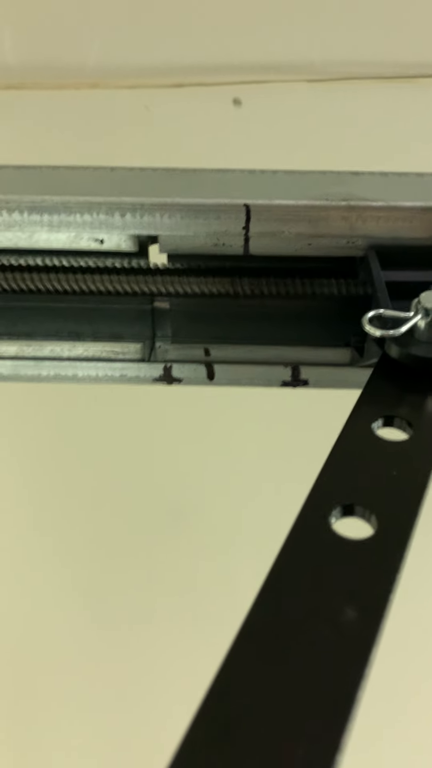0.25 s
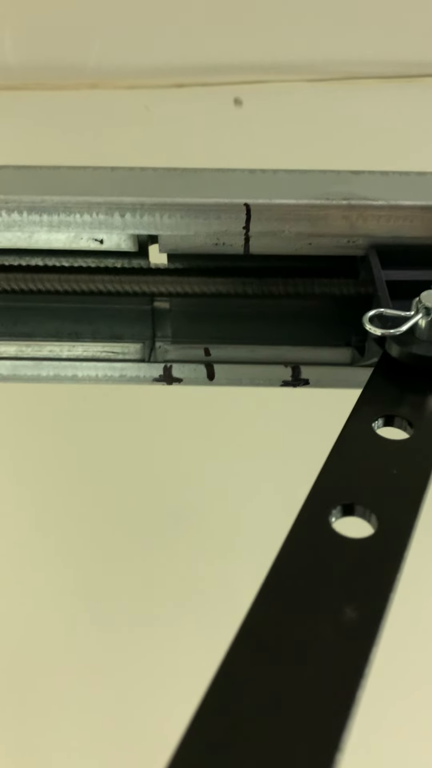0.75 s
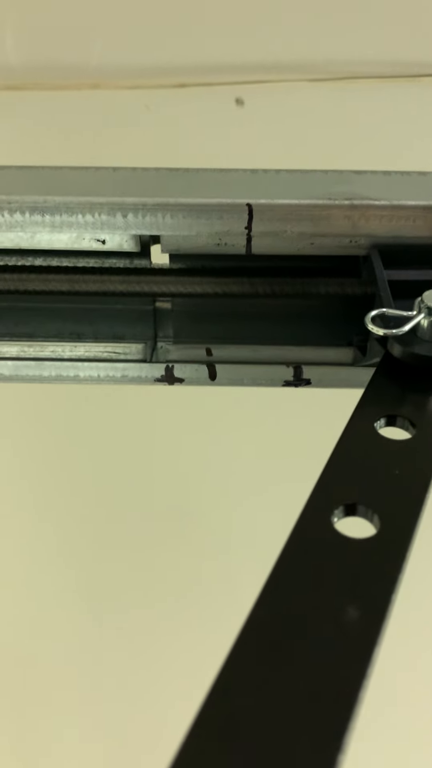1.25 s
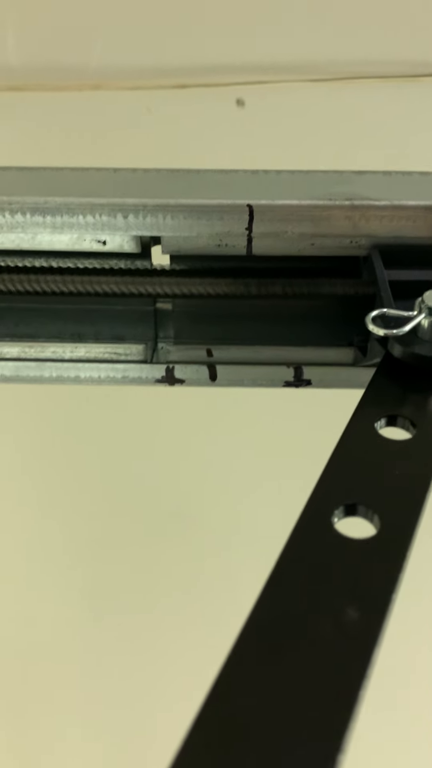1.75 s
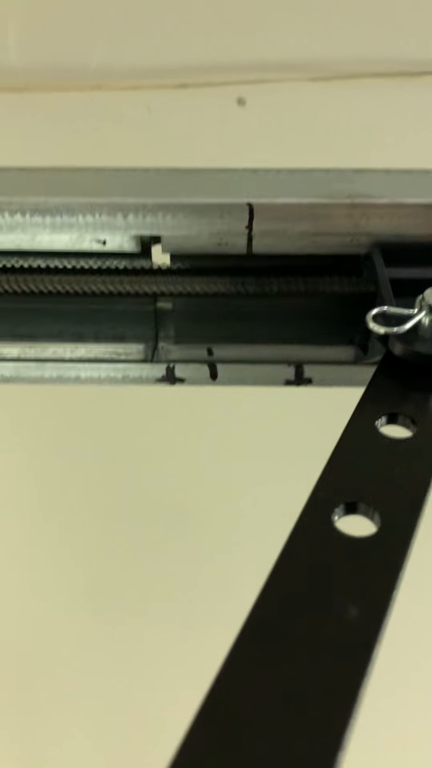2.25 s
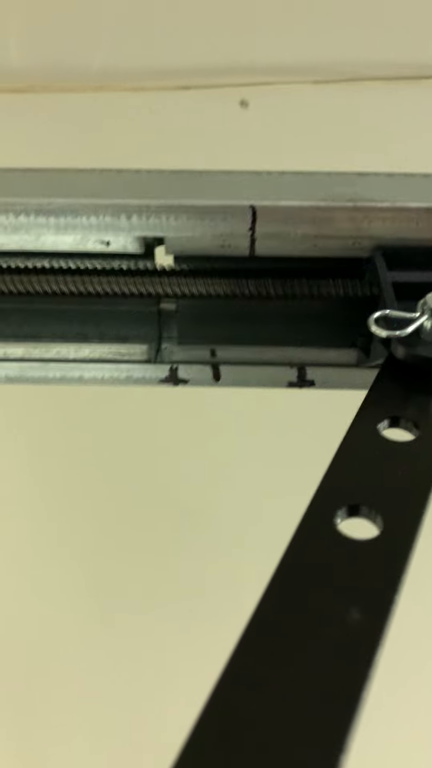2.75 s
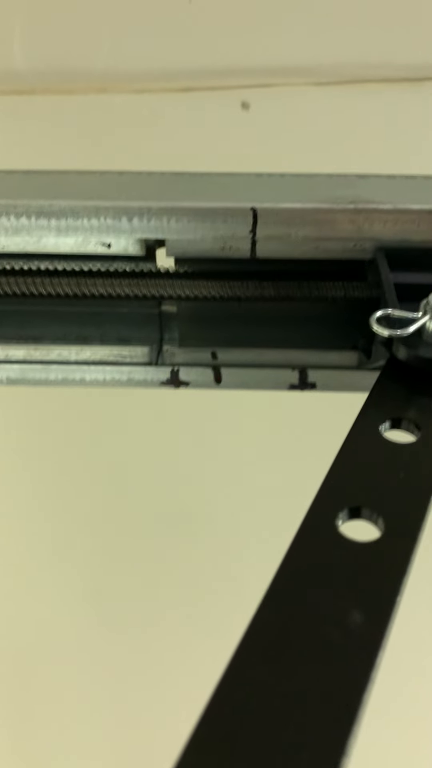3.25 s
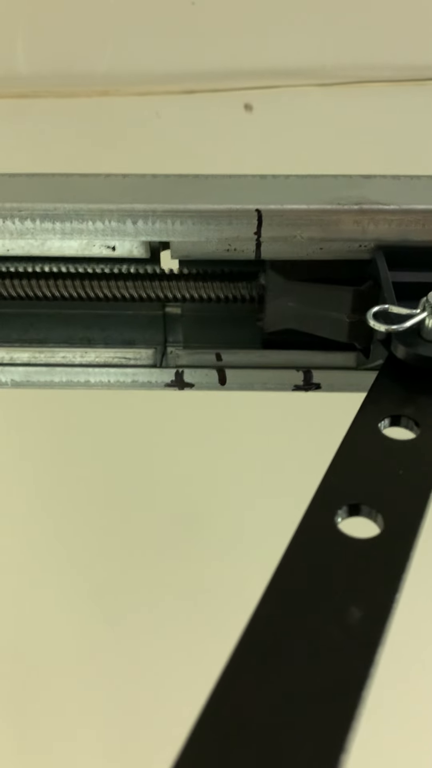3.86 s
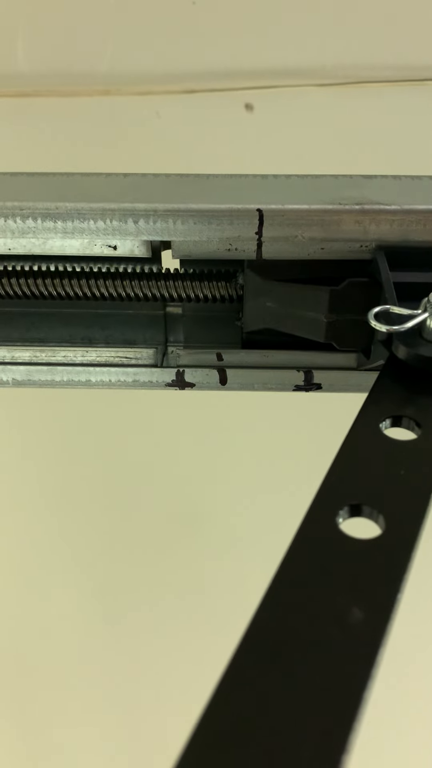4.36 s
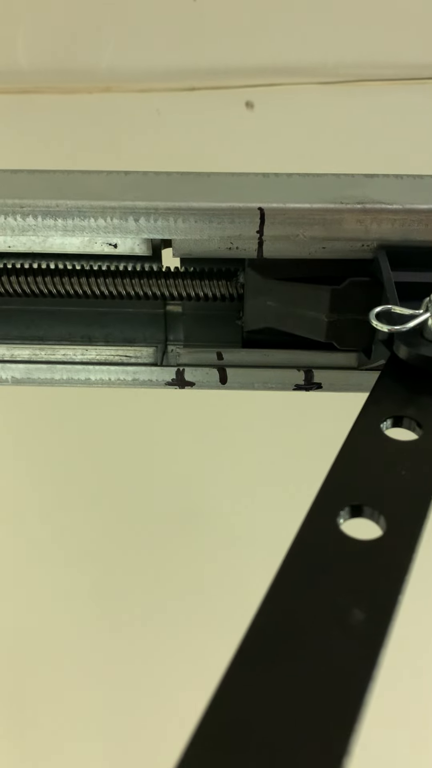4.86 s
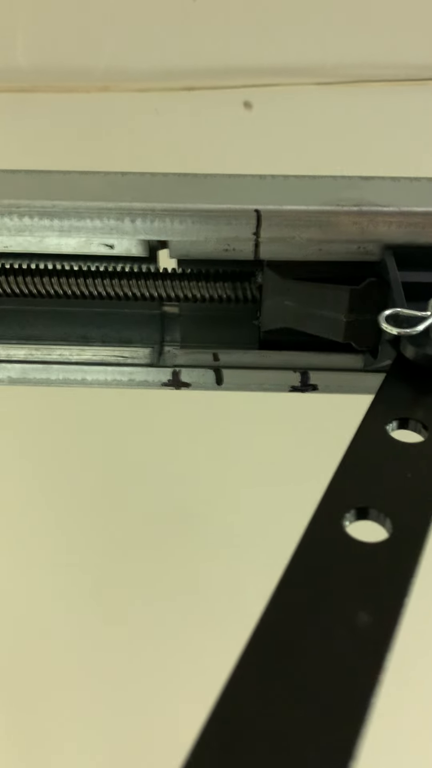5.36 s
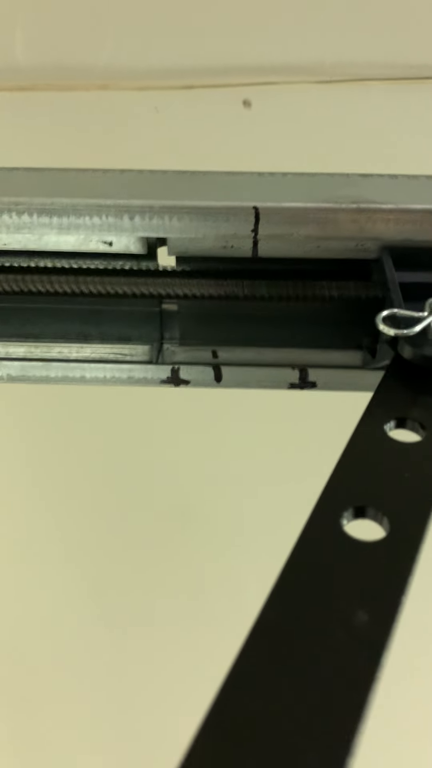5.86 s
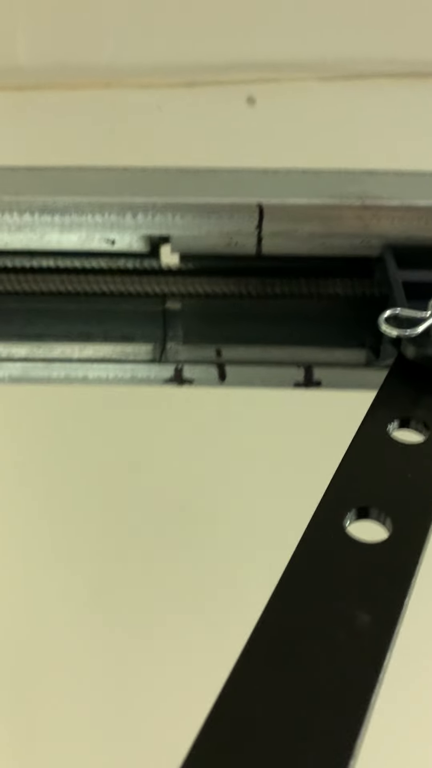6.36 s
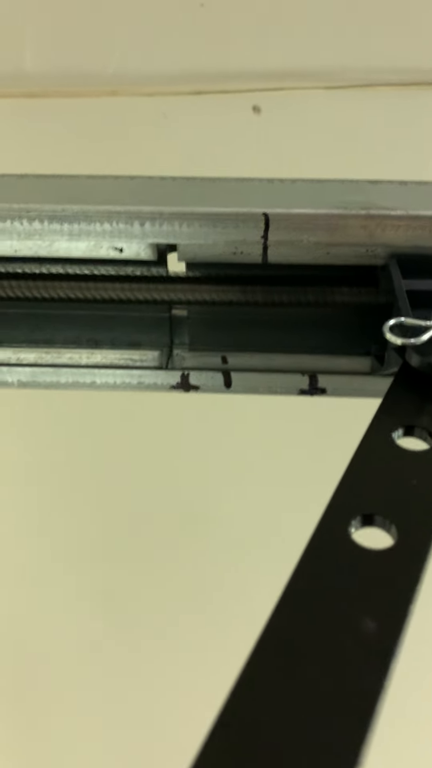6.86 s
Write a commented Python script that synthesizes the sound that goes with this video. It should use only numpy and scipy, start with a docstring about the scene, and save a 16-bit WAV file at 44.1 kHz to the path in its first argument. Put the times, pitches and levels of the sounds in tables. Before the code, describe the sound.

From the start, a threaded steel rod spins in its rail close overhead: a low hum around 50-120 Hz, a rapid rattle about 23 times a second, rough hiss and a thin, steady 10 kHz whine. Bright ticks repeat about every 0.04 s through the first second, with raspy chirps strongest near 1 s and a hard bump at 1.12 s. The run continues more evenly until 2.9 s, then groans briefly, loosens and drops in pitch. At about 4 s it fades quickly with a soft thud, clack and short scrape. Near quiet follows, with faint room noise and a tiny knock. At 5.1 s metal snaps and scrapes; clacks at 5.3 s lead into the restart. The rattle and hum climb rapidly, with low shudders near 6 s and a short groan at 6.16 s, then hold faster and higher until 7 s. The bare garage adds a short echo.

```python
"""A hum, a rattle that repeats each turn and a thin whine slow down and stop; after about a second of near quiet,
scrapes and clacks lead into a faster second run. This is a screw-drive garage door opener, heard from just under its rail.
The threaded rod strikes and rubs its rail and carriage, and shakes the ceiling at multiples of its speed.
The motor's switching supply makes the whine, steel parts snap and scrape, and the bare garage answers with an echo."""
import sys
import numpy as np
from scipy import signal
from scipy.fft import rfft, irfft, next_fast_len
from scipy.io import wavfile
from scipy.ndimage import uniform_filter1d, map_coordinates

SR = 44100
rng = np.random.default_rng(int(sys.argv[2]) if len(sys.argv) > 2 else 0)


def to_wav(sig):
    """Store sig (one row per channel, or 1-D mono) as 16-bit WAV at the path in sys.argv[1].

    Samples outside -1..1 are clipped; the rate is SR.
    """
    pcm = np.clip(np.atleast_2d(sig), -1, 1) * 32767
    pcm = np.round(pcm).astype(np.int16)
    wavfile.write(sys.argv[1], SR, pcm.T)  # frames by channels


N = 313102
T = np.arange(N) / SR  # time of each sample, s

COAST_S, START_S = 4.01, 5.33  # the drive begins to fade; the second run is at full strength
CRUISE_TURNS_PER_S = 23.4

# In noise colours only the shape counts, because the noise is brought to rms 1.
# colour of the shaken mounts: (frequency [Hz], level [dB])
MOUNT_COLOUR = [(20, -29), (40, -9), (65, 4.5), (95, -2), (150, -4), (220, -13), (800, -51.5)]
# colour of a sharp crack of steel: (frequency [Hz], level [dB])
CRACK_COLOUR = [(1500, -17.5), (4000, -3.5), (6800, 5), (10500, -1), (15000, 0)]
# strength of the room's sound against the direct sound: (frequency [Hz], level [dB])
ROOM_OVER_DIRECT = [(60, -6), (300, 0), (900, -6), (1400, -12), (2000, -1), (3000, -1), (5000, -10)]


def amp(db):
    """Turn decibels into a gain."""
    return 10 ** (np.asarray(db) / 20)


def unit(x):
    """Scale to rms 1."""
    return x / np.sqrt(np.mean(x ** 2) + 1e-20)


def along(points, hz):
    """Read (Hz, value) points along a logarithmic frequency axis."""
    f, v = np.transpose(points)
    return np.interp(np.log(hz + 1), np.log(f + 1), v)


def curves(rows):
    """Give one value per sample for each column after the time."""
    s, *cols = np.transpose(rows)
    return [np.interp(T, s, c) for c in cols]


def wobble(rate):
    """A smooth random curve with the given number of knots a second."""
    knots = rng.standard_normal(int(N * rate / SR) + 4)
    steps = np.arange(0, len(knots) - 1, 1 / 8)
    return np.interp(T * rate, steps, map_coordinates(knots, [steps]))


def filtered(x, response):
    """Multiply the spectrum of x by a response that may be complex."""
    m = next_fast_len(N + SR // 2)
    return irfft(rfft(x, m) * response(np.fft.rfftfreq(m, 1 / SR)), m)[..., :N]


def mode_power(hz, modes):
    """Summed power of resonances (centre Hz, half width Hz, gain); each has half its gain one half width away."""
    return sum((gain / (1 + ((hz - centre) / width) ** 2)) ** 2 for centre, width, gain in modes)


def coloured(x, spectrum, modes=(), size=8192):
    """Send x through a body with a broad spectrum and resonances that answers only after it is struck; rms 1."""
    hz = np.fft.rfftfreq(size, 1 / SR)
    peaks = [(centre, width, amp(db)) for centre, width, db in modes]
    power = amp(along(spectrum, hz)) ** 2 + mode_power(hz, peaks)
    # folding the cepstrum forward in time gives the minimum-phase response
    cepstrum = irfft(np.log(power + 1e-12) / 2)
    cepstrum[1:size // 2] *= 2
    cepstrum[size // 2 + 1:] = 0
    response = irfft(np.exp(rfft(cepstrum)))
    return unit(signal.fftconvolve(x, response)[:N])


def noise(spectrum):
    """Coloured noise of rms 1."""
    return coloured(rng.standard_normal(N), spectrum)


def resonance(x, hz, width_hz):
    """Send x through one resonance whose centre may move; rms 1."""
    # shift the centre down to 0 Hz, smooth, and shift back up
    carrier = np.exp(2j * np.pi * np.cumsum(hz + np.zeros(N)) / SR)
    pole = np.exp(-2 * np.pi * width_hz / SR)
    smoothed = signal.lfilter([1], np.poly([pole, pole]), x / carrier)
    return unit(np.real(smoothed * carrier))


def dying(x, t60):
    """Every impulse of x starts a decay that falls 60 dB in t60 seconds, cut off after a quarter second."""
    return signal.fftconvolve(x, amp(-60 * T[:SR // 4] / t60))[:N]


def swell(s, half):
    """A bell-shaped envelope centred on s."""
    return np.exp(-((T - s) / half) ** 2)


def jolt(s, rise, t60):
    """An envelope that rises from s and dies away."""
    return np.clip((T - s) / rise, 0, 1) * amp(-60 * np.maximum(T - s - rise, 0) / t60)


def each_turn(turns, share, half):
    """A smooth bump that comes round once a turn."""
    return np.exp(-(((turns - share + .5) % 1 - .5) / half) ** 2)


def doublings(speed):
    """Count doublings of speed above cruising; a slower rod gives a negative count."""
    return np.log2(speed / CRUISE_TURNS_PER_S)


def speed_change(speed):
    """How fast the rod speeds up or slows down, in turns per s per s, smoothed over 6000 samples."""
    return np.abs(uniform_filter1d(np.gradient(speed) * SR, size=6000))


def running():
    """The drive's strength: it fades by 120 dB a second as the drive stops and returns within 0.048 s."""
    coasting = amp(-120 * np.maximum(T - COAST_S, 0))
    return np.maximum(coasting, np.clip((T - START_S) / 0.048 + 1, 0, 1))


def quiet():
    """The garage at rest: soft noise, partly shared by both sides, and a faint 600 Hz mains buzz."""
    # colour of the quiet: (frequency [Hz], level [dB])
    quiet_colour = [(20, -16.5), (65, -5), (115, -8.5), (200, -29.5), (600, -36), (1000, -42),
                    (16000, -53.5)]
    mains_buzz = amp(-88.0) * np.sin(2 * np.pi * 600 * T)
    shared = amp(-69.0) * noise(quiet_colour)
    each_side = amp(-66.0) * np.array([noise(quiet_colour), noise(quiet_colour)])
    return mains_buzz + shared + each_side


def garage(x):
    """The bare walls return a dying echo that differs at each microphone port."""
    # how long the echo rings: (frequency [Hz], time to fall 60 dB [s])
    ring_times = [(1000, 0.54), (4000, 0.037), (14000, 0.079)]
    hz, t, z = signal.stft(rng.standard_normal((2, SR // 2)), SR, nperseg=256)
    z = z * amp(-60 * t / along(ring_times, hz)[:, None])
    # give every frequency the same energy before the room's own balance is applied
    z = z / np.sqrt(np.sum(np.abs(z) ** 2, axis=2, keepdims=True))
    tail = signal.istft(z, SR, nperseg=256)[1]
    tail = tail / np.linalg.norm(tail[0])
    late = np.pad(x, (200, 0))[None]  # the echo starts 200 samples after the direct sound
    wet = signal.fftconvolve(late, tail, axes=1)[:, :N]

    def room_share(hz):
        """The room's part when room and direct power add up to one."""
        room = amp(along(ROOM_OVER_DIRECT, hz))
        return room / np.hypot(1, room)

    return filtered(wet, room_share)


def ports(x):
    """Direct sound reaches the two microphone ports out of step, by a phase that depends on frequency."""
    # how far the left port leads the right: (frequency [Hz], phase [radians])
    left_lead = [(0, 0), (800, 0), (1300, -1.3), (1700, .2), (2800, 2.1), (4000, 2.3), (4750, 3.14),
                 (6700, 6.28), (9000, 9.42), (16000, 19.6)]

    def response(hz):
        """Half the lead on each side, times the direct sound's share of the power."""
        lead = np.interp(hz, *np.transpose(left_lead))
        direct_share = 1 / np.hypot(1, amp(along(ROOM_OVER_DIRECT, hz)))
        return np.exp(.5j * np.outer([1, -1], lead)) * direct_share

    return filtered(x, response)


def whine(speed):
    """The switching supply sings at 10 kHz, louder with rod speed up to cruising, and fades faster than the drive."""
    powered = running() ** 4
    effort = np.sqrt(np.minimum(speed / CRUISE_TURNS_PER_S, 1))
    level_db = -47.5 - 5 * (T > START_S) + 1.6 * wobble(45)  # weaker in the second run
    tone = np.sin(2 * np.pi * 10000 * T + .35 * wobble(150))
    return powered * effort * amp(level_db) * tone


def hum(turns, speed):
    """The whirling rod shakes the ceiling at multiples of its speed; a tone swells as it crosses a resonance."""
    # broad answer of the ceiling: (frequency [Hz], level [dB])
    ceiling = [(25, -27), (47, -17), (68, -7), (92, -3), (112, -16), (127, -8), (142, -17), (160, -20),
               (190, -14), (270, -23), (500, -22)]
    # resonances of the ceiling: (frequency [Hz], half width [Hz], level [dB])
    ceiling_modes = [(63.93, 1.4, 4)]
    # a narrow range of the hum booms for a moment: (time [s], half length [s], frequency [Hz], level [dB])
    booms = [(.1, .85, 94, 2), (.6, .85, 47, -7.5), (.57, .16, 117, 0), (.908, .18, 364, 0),
             (1.05, .45, 70.4, -2), (1.33, .4, 115.5, -.5), (2.1, .3, 66.5, -6), (2.1, .48, 178, -1.5),
             (2.124, .42, 246, -2.5), (1.9, .25, 358, -5), (2.8, .3, 111.5, 4.5), (6.42, .18, 283, -7.5),
             (6.47, .2, 413, -6), (6.94, .08, 355, -4.5)]
    level_db, gain_db = -38.5, 8  # at cruising speed; for each doubling of speed
    boom_width = 0.048  # half width as a share of its frequency
    build_up_hz_per_s = 130  # a tone that glides this fast reaches half its power
    resonances = [(c, w, amp(db)) for c, w, db in ceiling_modes]
    resonances += [(c, boom_width * c, amp(db) * swell(s, half)) for s, half, c, db in booms]
    change = speed_change(speed)

    def tone(k, wander_db, waver, apart):
        """The tone at k times the rod speed: weaker while it glides, and in different phase at the two ports."""
        hz = k * speed
        power = amp(along(ceiling, hz)) ** 2 + mode_power(hz, resonances)
        glide_loss = np.hypot(1, k * change / build_up_hz_per_s)
        level = np.sqrt(2 * power) * amp(wander_db * wobble(4)) / glide_loss
        ports_apart = (-1) ** k * np.array([[1], [-1]]) * apart
        phase = 2 * np.pi * (k * turns + rng.random()) + waver * wobble(10)
        return level * np.sin(phase + ports_apart)

    sway = .2 * wobble(2)
    low = sum(tone(k, 1.1, .1, .42 + sway) for k in range(2, 6))
    high = sum(tone(k, 2.2, .25, .88 + sway) for k in range(6, 18))
    return amp(level_db + gain_db * doublings(speed)) * (low + high)


def shudders():
    """The rail's bending shows as brief low tones that swell and fade."""
    # shudders of the rail: (time [s], half length [s], frequency [Hz], level [dB])
    shudder_rows = [(1.27, .08, 74, -43), (3.1, 0.081, 64, -41.5),  (5.924, 0.057, 73, -32.5),
                    (6.1, 0.047, 73, -33)]
    out = np.zeros(N)
    for s, half, hz, db in shudder_rows:
        tone = np.sqrt(2) * np.sin(2 * np.pi * (hz * T + rng.random()))
        out += amp(db) * swell(s, half) * tone
    return out


def clacks(ring):
    """Steel parts snap home: a bright crack and a slightly longer ring with a 975 Hz tone."""
    # snaps of steel: (time [s], crack level [dB], ring level [dB])
    clack_rows = [(4.083, -42, -42), (5.0965, -37, -55), (5.288, -33.5, -39), (5.3152, -27, -25)]
    rise_s, crack_t60_s, ring_t60_s = .0005, .028, .05
    crack = noise(CRACK_COLOUR)
    clank = unit(np.sin(2 * np.pi * 975 * T) + .5 * ring)
    out = np.zeros(N)
    for s, crack_db, ring_db in clack_rows:
        out += amp(crack_db) * jolt(s, rise_s, crack_t60_s) * crack
        out += amp(ring_db) * jolt(s, rise_s, ring_t60_s) * clank
    return out


def bumps(ring, body):
    """The carriage bumps the rail, which rings over a weaker, duller knock."""
    # bumps on the rail: (time [s], rise [s], time to fall 60 dB [s], level [dB])
    bump_rows = [(1.122, .004, 0.054, -21.5), (4.581, 0.00071, 0.018, -63), (5.169, 0.02, .13, -33.5),
                 (5.336, .022, 0.0683, -33)]
    envelope = sum(amp(db) * jolt(s, rise, t60) for s, rise, t60, db in bump_rows)
    return envelope * (ring + amp(-18.5) * body)


def thuds(body):
    """The mounts take a jolt and give a low, slowly dying thud."""
    # jolts of the mounts: (time [s], level [dB])
    thud_rows = [(3.99, -42.5), (4.66, -63), (5.2, -39), (5.36, -32)]
    rise_s, t60_s = 0.0066, 0.43
    envelope = sum(amp(db) * jolt(s, rise_s, t60_s) for s, db in thud_rows)
    return envelope * (noise(MOUNT_COLOUR) + amp(-10.5) * body)


def scrapes(ring, body):
    """The thread slips in the carriage with a dying hiss, some ring and a faint duller sound."""
    # slips of the thread: (time [s], time to fall 60 dB [s], hiss level [dB], body level [dB])
    scrape_rows = [(4.083, 0.39, -44.5, -50), (5.015, 1, -54, -50), (5.097, 0.87, -45.5, -78)]
    # colour of the hiss: (frequency [Hz], level [dB])
    scrape_colour = [(1000, -42), (3000, -2.5), (7200, -3.5), (11500, -1.5), (16000, -10.5)]
    rise_s = 0.00402
    slip = noise(scrape_colour) + amp(-9.5) * ring
    out = np.zeros(N)
    for s, t60, hiss_db, body_db in scrape_rows:
        out += jolt(s, rise_s, t60) * (amp(hiss_db) * slip + amp(body_db) * body)
    return out


def knocks():
    """Single clacks, bumps, thuds and scrapes share the same ringing and dull noises."""
    # colour of the dull body sound: (frequency [Hz], level [dB])
    body_colour = [(150, -40.5), (450, 8.5), (600, 2), (700, -6), (950, -5), (3000, -50)]
    # colour of the rail's ring: (frequency [Hz], level [dB])
    ring_colour = [(300, -20.5), (1000, -1.5), (1500, -3), (2100, -12), (8000, -27.5)]
    body, ring = noise(body_colour), noise(ring_colour)
    return clacks(ring) + bumps(ring, body) + thuds(body) + scrapes(ring, body)


def ticks():
    """Burrs on the thread make short bright cracks as they pass through the carriage."""
    # passing burrs: (time [s], level before a 2 dB lift [dB])
    tick_rows = [(0.042, -22.5), (.0832, -19), (0.126, -22.5), (0.1678, -23.5), (0.2123, -26),
                 (.2538, -30.5), (0.2974, -28.5), (.34, -26.5), (.382, -25.5), (.4254, -28), (0.469, -25),
                 (0.5115, -28), (0.555, -24.5), (0.5968, -22.5), (0.6394, -23), (0.6818, -22.5),
                 (0.7252, -21.5), (0.7688, -24), (0.8122, -23.5), (.855, -24), (.8973, -29), (0.941, -28.5),
                 (0.984, -24), (1.07, -18), (1.1104, -22), (1.3445, -25)]
    hits = np.zeros(N)
    for s, db in tick_rows:
        hits[int(s * SR)] = amp(db + 2)
    return dying(hits, t60=.02) * noise(CRACK_COLOUR)


def chirps(turns):
    """For a while a dry patch of the rod rubs one resonance of the rail each time it comes round."""
    middle_s, half_s, level_db = 1, 0.47, -26.5
    rubbed = resonance(rng.standard_normal(N), hz=1938, width_hz=120)
    patch = each_turn(turns, share=.3, half=0.12)
    return amp(level_db) * swell(middle_s, half_s) * patch * rubbed


def groans(chatter):
    """The carriage groans as it binds briefly: the rattle excites one narrow resonance, which glides."""
    # groans: (time [s], half length [s], frequency [Hz], glide [Hz per s], level [dB])
    groan_rows = [(2.862, 0.032, 691, 0.5, -30.5), (3.053, .098, 744, 747.5, -32),
                  (6.16, 0.067, 714, -80, -31)]
    out = np.zeros(N)
    for s, half, hz, glide, db in groan_rows:
        centre_hz = hz + glide * np.clip(T - s, -2 * half, 2 * half)
        out += amp(db) * swell(s, half) * resonance(chatter, centre_hz, width_hz=53)
    return out


def blows(turns, scatter, drift_db, size_db):
    """The rod gives one impulse each time a contact comes round; each contact waxes and wanes."""
    # where the rod touches the rail: (place [share of a turn], level [dB])
    contacts = [(.01, 2.5), (.16, 3), (.33, 8.5), (.56, -0.5), (0.751, 6)]
    out = np.zeros(N)
    for share, db in contacts:
        s = np.interp(np.arange(int(turns[-1])) + np.clip(share, 0, 1), turns, T)
        late, size = rng.standard_normal((256, 2))[:len(s)].T
        at = np.clip(((s + scatter * late) * SR).astype(int), 0, N - 1)
        out[at] += amp(db + size_db * size + drift_db * wobble(2.024)[at])
    return out


def rattle(turns, speed, t60, scatter, loose, slide):
    """Blows run along the rail: part repeats every turn, part is loose grinding, part is steady sliding."""
    hits = blows(turns, scatter, drift_db=1.4, size_db=1.1) / np.sqrt(speed)
    # reflections between the rail's ends smear each blow; only the phases of this random tail are used
    tails = rng.standard_normal((2, SR // 4)) * amp(-60 * T[:SR // 4] / t60)
    paths = irfft(np.exp(1j * np.angle(rfft(tails))), SR // 4)
    near, far = signal.fftconvolve(hits[None], paths, axes=1)[:, :N]
    shift = T / 2 + 0.28 * wobble(2)  # the pattern shifts as the carriage travels
    repeating = unit(np.cos(shift) * near + np.sin(shift) * far)
    grinding = unit(np.sqrt(np.abs(dying(hits ** 2, t60))) * rng.standard_normal(N))
    loose = np.clip(loose, 0, 1)
    knocking = np.sqrt(1 - loose) * repeating + np.sqrt(loose) * grinding
    sliding = np.clip(slide * (22 / speed) ** 3, 0, .85)  # a slow rod slides more than it knocks
    return np.sqrt(1 - sliding) * knocking + np.sqrt(sliding) * rng.standard_normal(N)


def drive(turns, speed):
    """The rod in its rail: ring, buzz, rattle, thread hiss and the shaking of the mounts grow with its speed."""
    # how hard the carriage drags on the rod: (time [s], level [dB])
    drag = [(0, 0.8), (1.25, 1.5), (2.2, -2.5), (3, 1.5), (3.5, -0.26), (5.5, -1.5), (6.25, -0.05),
            (6.6, -2), (7.1, -2)]
    # how loosely the rod rattles: (time [s], looseness [0 = the same every turn .. 1 = tumbling])
    looseness = [(1.02, .25), (1.2, .65), (1.4, .12), (2.8, .1), (2.9, .9), (6.15, .9), (6.3, .08)]
    # the thread sweeps the carriage twice a turn: (place [turns], half width [turns], level over the hiss [dB])
    sweeps = [(0.359, 0.064, 1.5), (.77, 0.104, 5.5)]
    # resonances of the rail's ringing middle: (frequency [Hz], half width [Hz], level [dB])
    rail_modes = [(1341, 88, 2), (1406, 55, 3)]
    # colour of the rail's loose buzz: (frequency [Hz], level [dB])
    rail_colour = [(600, -36), (1400, -27), (1750, -37.5), (2150, -11), (2400, -23), (3500, -42),
                   (8000, -52.5)]
    # a higher resonance in that buzz: (frequency [Hz], half width [Hz], level [dB])
    upper_modes = [(1943, 74, -4)]
    # colour of the carriage: (frequency [Hz], level [dB])
    carriage_colour = [(100, -54), (250, -22), (450, -10.5), (560, -7.5), (820, -6), (1150, -10.5),
                       (1500, -43), (4000, -67.5)]
    # resonances of the carriage: (frequency [Hz], half width [Hz], level over its rms-1 colour [dB])
    carriage_modes = [(903.6, 13, -1), (1026.6, 27.6, -1), (1501, 39, -5), (1604, 35, -2.5)]
    # colour of the thread's hiss: (frequency [Hz], level [dB])
    thread_colour = [(1200, -3), (2500, 6), (4200, -3), (5200, -3.5), (6900, 1.5), (7800, -5), (9500, -12),
                     (13000, -7.5), (14500, -4), (16000, -14.5)]
    # resonances in that hiss: (frequency [Hz], half width [Hz], level [dB])
    thread_modes = [(3880, 250, 2.5), (6060, 130, 1.5), (6520, 45, 5.5), (6820, 70, 2.5)]

    pace, restarted = doublings(speed), T > START_S
    drag_db, = curves(drag)
    rough, = curves(looseness)
    # level at cruising speed, then dB for each doubling of speed; the rod bears more lightly in the second run
    rail_db = -31 + 15.5 * pace - 4.5 * restarted
    carriage_db = -36.5 + 10.5 * pace + drag_db
    sweep_db = (1 - rough) * sum(db * each_turn(turns, share, half) for share, half, db in sweeps)
    hiss_db = -37.5 + 9.5 * pace + drag_db - 1.5 * restarted + sweep_db
    shake_db = -38.5 + 4 * pace - 20 * (1 - rough)  # the mounts calm down when the rod runs true

    twisted = turns + .009 * rough * wobble(7)  # the long rod winds up and unwinds a little
    ring = rattle(twisted, speed, t60=.04, scatter=.00001, loose=.01 + .8 * rough ** 2, slide=.04)
    chatter = rattle(twisted, speed, t60=.05, scatter=.00004, loose=.12 + .8 * rough, slide=.1)
    rubbing = rng.standard_normal(N) * amp(1.5 * wobble(300))  # fine grit makes the rubbing uneven

    # the extra running() makes the ring die first as the rod coasts
    rail = running() * amp(rail_db) * coloured(ring, [(1000, -56.5)], rail_modes)
    buzz = amp(rail_db - 11.5 + drag_db) * coloured(rubbing, rail_colour, upper_modes)
    modes = np.zeros(N)
    for hz, width, db in carriage_modes:
        # each waxes and wanes as the carriage travels
        modes += amp(db + 2.5 * wobble(2.955)) * resonance(chatter, hz, width)
    carriage = amp(carriage_db) * (coloured(chatter, carriage_colour) + modes)
    thread = amp(hiss_db) * coloured(rubbing, thread_colour, thread_modes)
    shake = amp(shake_db) * noise(MOUNT_COLOUR)
    flutter = amp(.7 * wobble(45))  # uneven pressure on the rail
    return flutter * (rail + buzz + carriage) + thread + shake + groans(chatter) + chirps(turns) + ticks()


def scene():
    """The opener, its echo, the humming ceiling close overhead and the quiet of the garage."""
    # speed of the rod, one group of rows for each run: (time [s], speed [turns per s])
    speed_runs = [
        [(0, 23.5), (.42, 23.28), (.63, 23.55), (.78, 23.2), (1.12, 23.42), (1.35, 23.03), (1.9, 22.5),
         (2.35, 21.98), (2.48, 22.3), (2.88, 22.52), (3.45, 13.5), (4.05, 10.6)],
        [(5.35, 10.6), (6.28, 31.92), (6.57, 31.55), (6.92, 32.52)],
    ]
    speed, = curves(np.vstack(speed_runs))
    turns = np.cumsum(speed) / SR
    opener = running() * drive(turns, speed) + knocks()
    direct = ports(opener + whine(speed))
    ceiling_hum = running() * hum(turns, speed)
    return direct + garage(opener) + ceiling_hum + shudders() + quiet()


def record(dry):
    """Nothing is kept at or above the band limit of 15.9 kHz."""
    return filtered(dry, lambda hz: hz < 15900)


dry = scene()
out = record(dry)
to_wav(out)
```